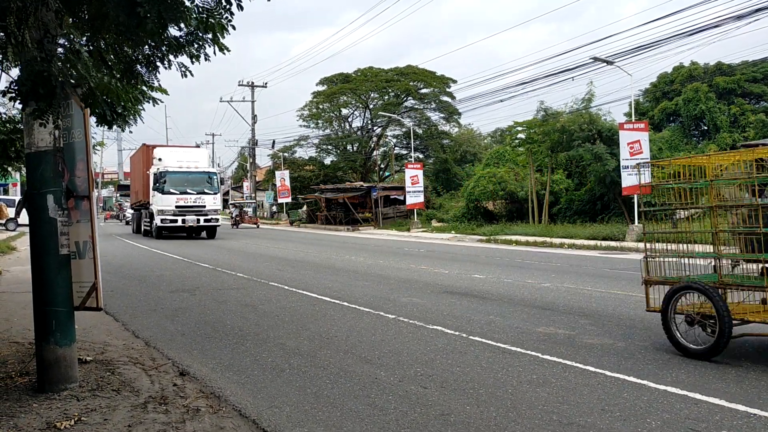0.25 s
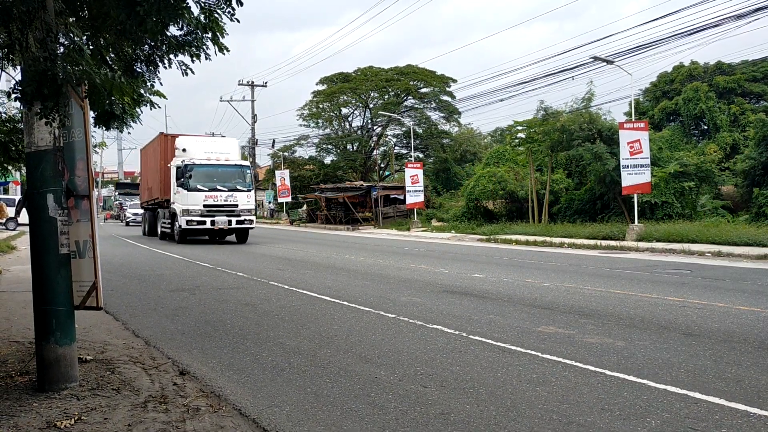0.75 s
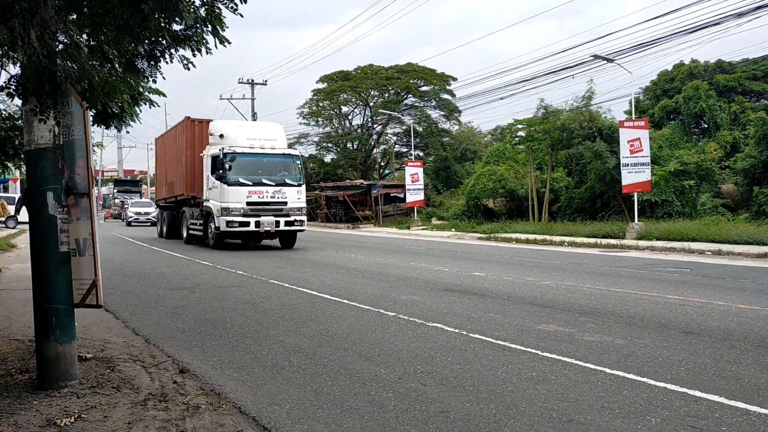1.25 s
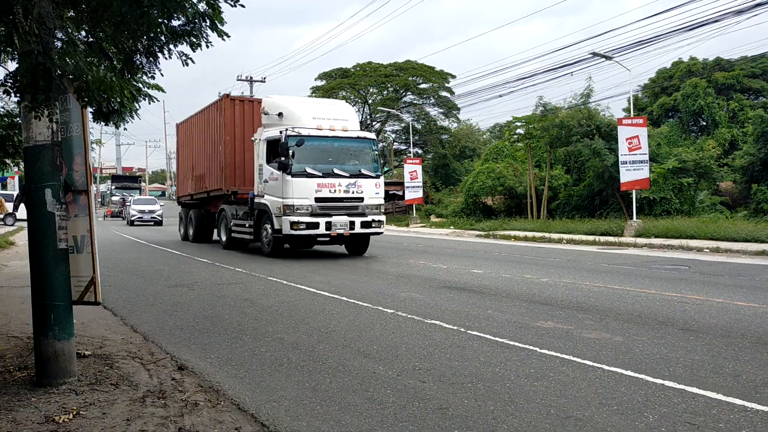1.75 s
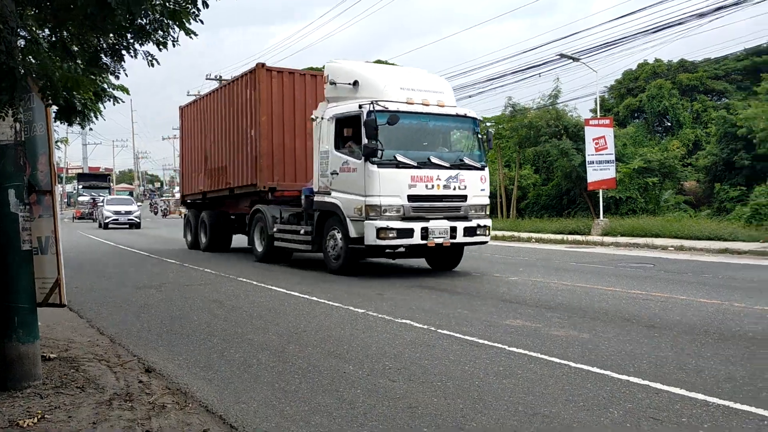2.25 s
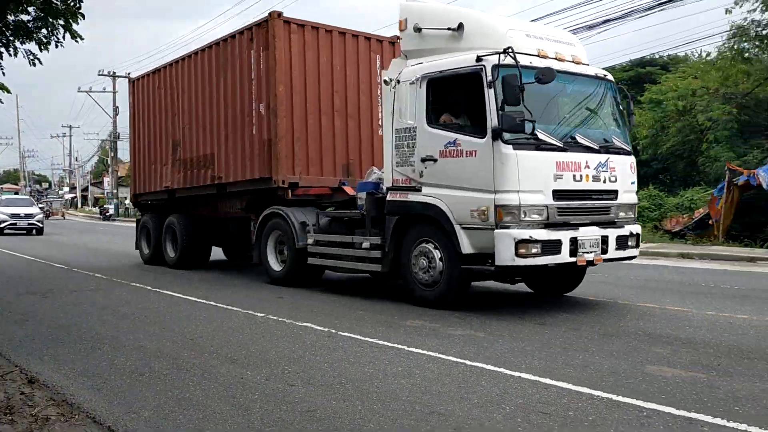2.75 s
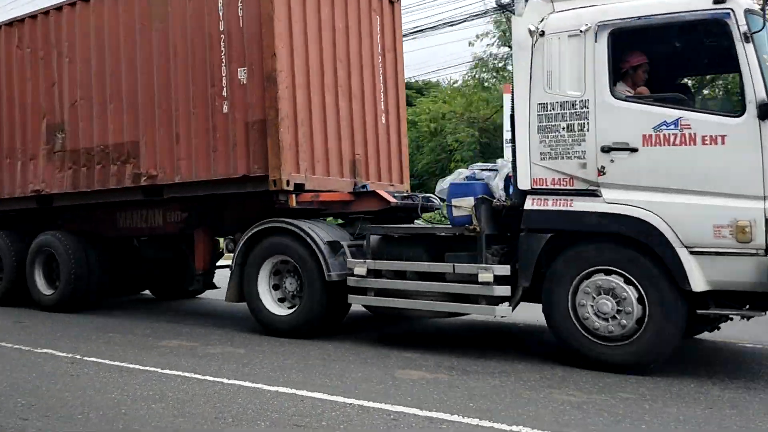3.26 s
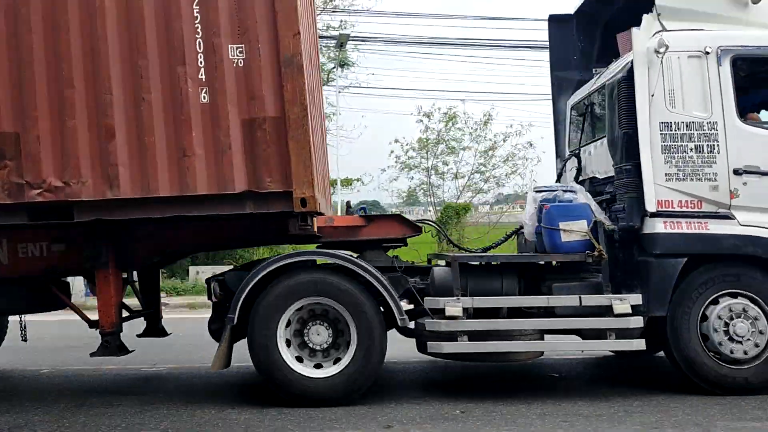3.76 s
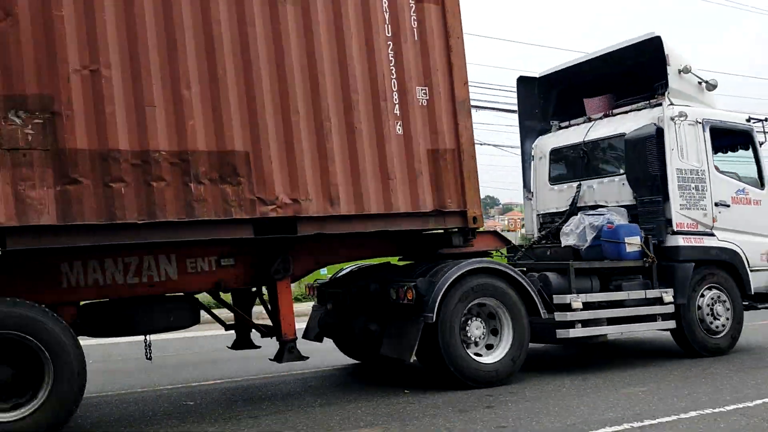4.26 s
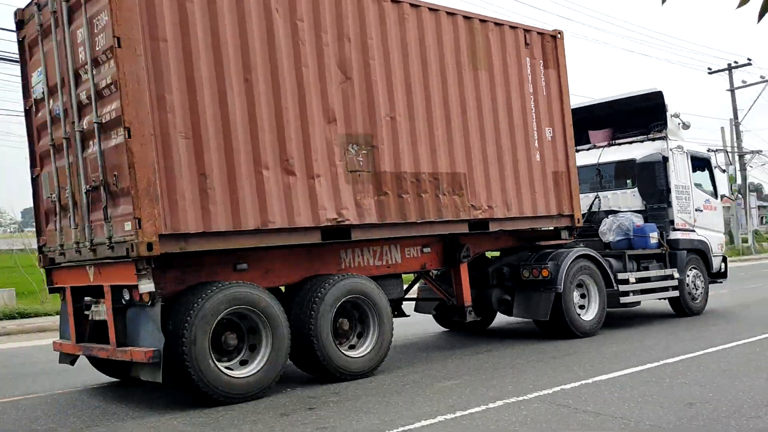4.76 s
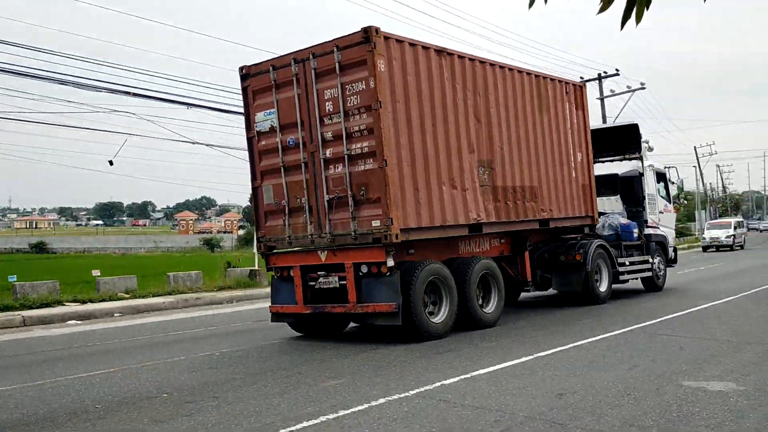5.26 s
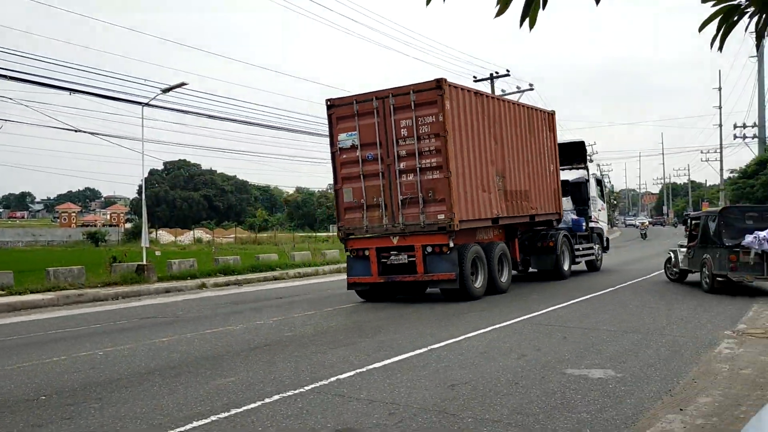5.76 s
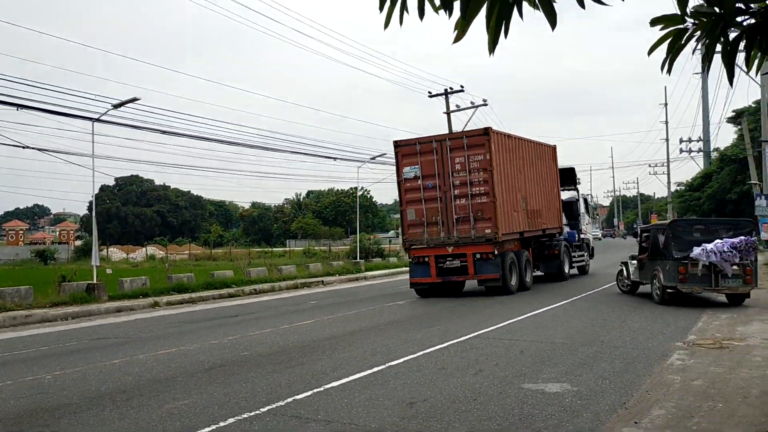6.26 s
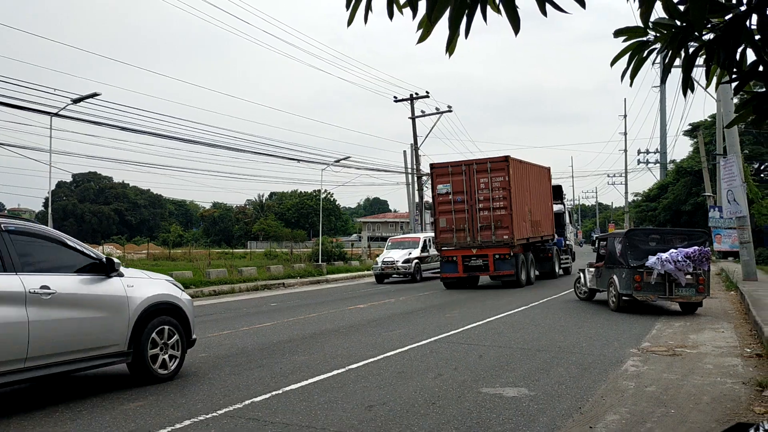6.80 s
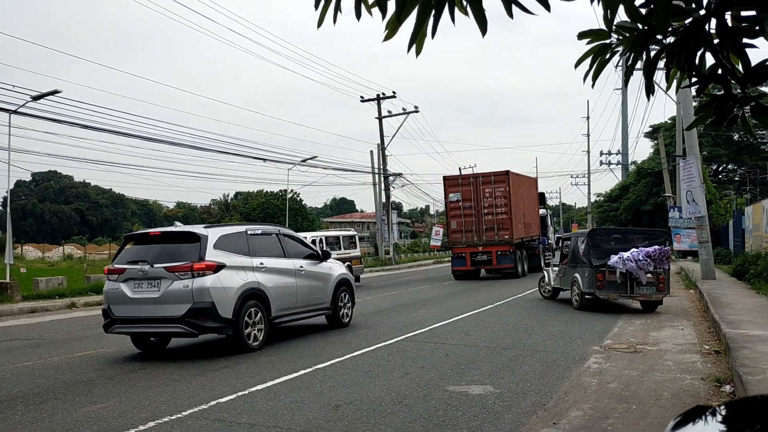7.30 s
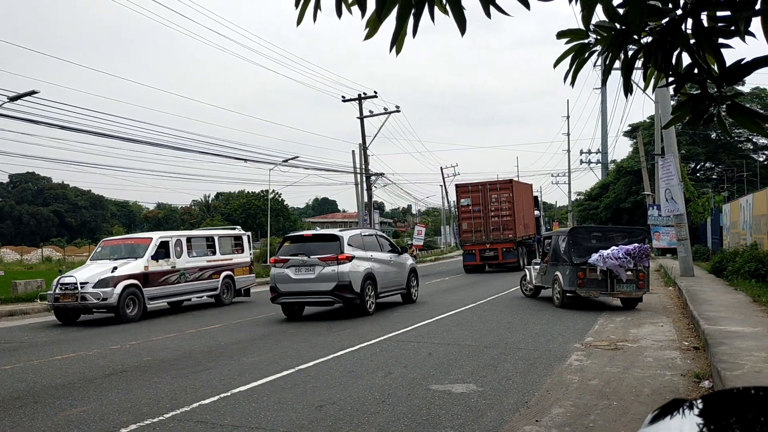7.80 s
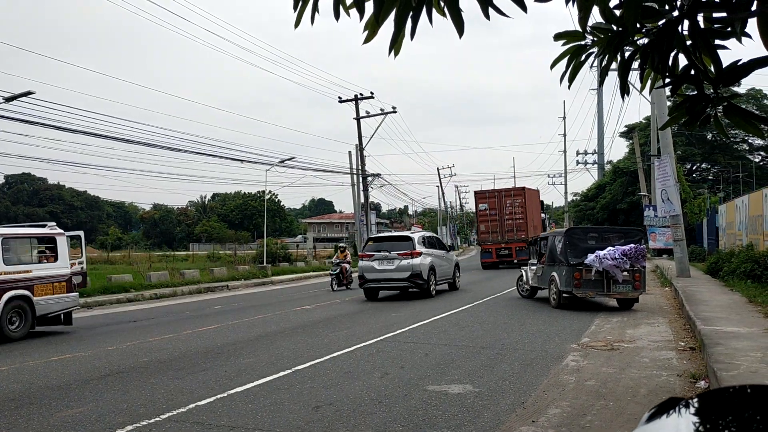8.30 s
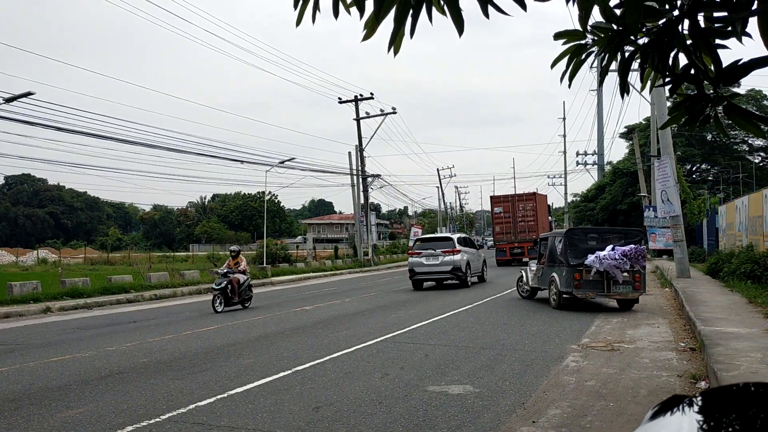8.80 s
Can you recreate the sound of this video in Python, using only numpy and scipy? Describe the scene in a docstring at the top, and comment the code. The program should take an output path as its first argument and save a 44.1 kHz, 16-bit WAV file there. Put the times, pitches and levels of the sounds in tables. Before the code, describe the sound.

A stationary microphone beside a highway catches continuous tyre noise and low rumble. First a motor tricycle's buzzing exhaust recedes; then a diesel truck swells with pulsing air hiss, whining tyres and short steel chirps, its low drone lingering behind. A car rushes past quickly, a van blends in behind it, and booming motorcycles close the scene with hard, separate exhaust thumps. Wind from the passing vehicles gently buffets the microphone.

```python
"""Roadside highway traffic

From one spot on the verge: a cargo tricycle pulls away, then a container truck rolls past with droning
exhaust, diesel clatter and a squeaking trailer. A car swishes by close behind it, followed by a van and
motorcycles, the last one thumping. Engines are harmonics of a firing rate, tyre roar and hiss are
coloured noise that swells with each pass, squeaks are short gliding tones."""
import sys
import numpy as np
from scipy import signal
from scipy.fft import rfft, irfft, next_fast_len
from scipy.io import wavfile
from scipy.ndimage import uniform_filter1d

SR = 44100
rng = np.random.default_rng(int(sys.argv[2]) if len(sys.argv) > 2 else 0)


def to_wav(s):
    """Save 16-bit WAV."""
    ch = np.atleast_2d(s).T  # columns
    pcm = np.round(np.clip(ch, -1, 1) * 32767)  # PCM
    wavfile.write(sys.argv[1], SR, pcm.astype(np.int16))


N = 398663
TIME = np.arange(N) / SR

# one-cylinder engine of the cargo tricycle: (time [s], firing rate [Hz])
TRICYCLE_ENGINE = [(0.0, 47.9), (0.22, 48.9), (1.11, 50.2), (2.25, 50.1), (3.02, 51.98), (3.9, 53.4)]
# diesel of the truck: (time [s], crank rate [turns/s], level [dB])
TRUCK_DIESEL = [(0, 28, -67), (1.2, 27.7, -41.5), (2.5, 29.4, -37.5), (3.3, 28, -45), (4.1, 27.7, -33),
                (4.6, 28, -30.5), (5.2, 24.3, -39), (6.1, 20.5, -47)]
# engine of a motorcycle: (time [s], firing rate [Hz])
BIKE_ENGINE = [(7.95, 49.9), (8.24, 49.92), (8.44, 53.3), (8.7, 52.17), (9.04, 47.7)]


def gain_of(db):
    """Decibels to amplitude."""
    return 10 ** (np.asarray(db) / 20)


def evened(x):
    """Scales to an rms of 1."""
    return x / np.sqrt(np.mean(x ** 2) + 1e-20)


def curves(rows):
    """The columns of a table after its time column, interpolated sample by sample."""
    s, *columns = np.transpose(rows)
    return [np.interp(TIME, s, column) for column in columns]


def present(rows, fade_s=0.11):
    """1 while a table runs, fading to 0 outside it."""
    start, end = rows[0][0], rows[-1][0]
    return np.interp(TIME, [start - fade_s, start, end, end + fade_s], [0, 1, 1, 0])


def coloured(x, points):
    """Gives a signal a spectrum, drawn straight over log frequency, at an rms of 1."""
    hz, db = np.transpose(points)
    size = next_fast_len(N)
    bins_hz = np.fft.rfftfreq(size, 1 / SR)
    shape_db = np.interp(np.log(bins_hz + 1), np.log(hz + 1), db, left=-100, right=-100)
    return evened(irfft(rfft(x, size) * gain_of(shape_db), size)[:N])


def noise(points):
    """Noise with the given spectrum."""
    return coloured(rng.standard_normal(N), points)


def wander(per_s):
    """Random drift at an rms of 1 that takes a new direction per_s times a second."""
    knots = rng.standard_normal(4000)
    return evened(np.interp(TIME * per_s, np.arange(len(knots)), knots))


def add(mix, s, sound):
    """Mixes a sound in at time s."""
    part = mix[round(s * SR):][:len(sound)]
    part += sound[:len(part)]


def nearness(s, rise_s, fall_s):
    """Power of something that goes by in a straight line: 1 when it is closest, at time s."""
    falloff = 2.35  # how steeply power sinks with distance
    away = (TIME - s) / np.where(TIME < s, rise_s, fall_s)
    return (1 + away ** 2) ** -falloff


def swells(rows, steady_db=-np.inf):
    """Amplitude of several swells over a steady level, summed as power."""
    power = sum(gain_of(db) ** 2 * nearness(*when) for *when, db in rows)
    return np.sqrt(gain_of(steady_db) ** 2 + power)


def exhaust(hz, orders, rough, smear=0):
    """Harmonics of a firing rate; uneven combustion makes each flutter, smear draws its phase at random."""
    turns = np.cumsum(hz) / SR
    total = 0
    for multiple, db in orders:
        flutter = 1 + rough * wander(22)
        phase = 2 * np.pi * (multiple * turns + smear * rng.random())  # smear: widest offset in cycles
        total = total + gain_of(db) * flutter * np.cos(phase)
    return np.sqrt(2) * total


def knocks(hz, depth, decay=.3):
    """Gain that leaps at every firing and dies away, decay in periods; depth is the rms swing."""
    blow = np.exp(-(np.cumsum(hz) / SR % 1) / decay)
    return 1 + np.clip(depth, 0, .7) * evened(blow - blow.mean())


def tricycle():
    """The silencer passes mostly the second order; orders swell as the tailpipe swings by."""
    # swells of three exhaust orders: (loudest at [s], rise [s], fall [s], level [dB])
    second_swells = [(.46, 0.38, 0.46, -14.5)]
    third_swells = [(.37, 0.21, 0.3, -23)]
    fourth_swells = [(.36, 0.3, 0.21, -29.5), (.93, 0.3, 0.37, -29)]
    # steady levels of these orders, left once it is far off: (second [dB], third [dB], fourth [dB])
    far_levels = (-36, -37.5, -39.5)
    # the throttle opens and the upper orders grow: (time [s], rise [s], fall [s], boost [dB])
    throttle = (3, 0.53, .55, 6.2)

    hz, = curves(TRICYCLE_ENGINE)
    lobes = zip((second_swells, third_swells, fourth_swells), far_levels)
    second, third, fourth = 20 * np.log10([swells(rows, far_db) for rows, far_db in lobes])
    *when, boost_db = throttle
    rev_db = boost_db * nearness(*when)
    third, fourth = third + rev_db, fourth + rev_db
    orders = [(1, second - 20), (2, second), (3, third - .7),
              (4, fourth - .7), (5, fourth - 8), (6, fourth - 14)]
    return present(TRICYCLE_ENGINE) * exhaust(hz, orders, rough=0.059, smear=0.62)


def traffic():
    """Sums the power of passing and distant vehicles into gains of roar, hiss, rumble, and hiss brightness."""
    # swells of passing traffic, some vehicles made of several overlapping swells: (loudest at [s],
    # rise [s], fall [s], roar [dB], hiss [dB], brightness of the hiss [0-1], rumble [dB])
    passes = [(.15, 1.1, 1.9, -27.5, -44.5, .72, -31), (2.95, 1.25, 0.7, -29, -44.5, 0.67, -36),
              (4.4, 1.23, 0.72, -24.5, -44.5, 0.7, -31), (5.9, 1.65, 0.78, -25.5, -53, 1, -39),
              (6.42, 0.11, 0.2, -25, -47.5, 0, -35), (6.83, 0.078, 0.11, -21, -45, .1, -33),
              (6.96, 0.095, 0.094, -19.5, -38, .15, -41), (7.66, 0.8, .5, -27, -48.5, .05, -34),
              (8.0, 0.24, .3, -28, -40.5, 0.7, -36), (8.12, 0.064, 0.12, -23, -38, 0.7, -29),
              (8.33, .1, 0.049, -21, -34.5, .75, -27.5), (8.57, 0.21, 0.18, -21, -38.5, .95, -33),
              (8.78, 0.15, 0.11, -19.5, -37, 1, -29), (8.97, 0.15, 0.27, -24, -42.5, 0, -28)]
    far = (-30.5, -51, .3, -35)  # distant traffic: the last four columns of the same kind

    near = np.array([np.ones(N)] + [nearness(*row[:3]) for row in passes])
    roar_db, hiss_db, brightness, rumble_db = np.transpose([far] + [row[3:] for row in passes])
    roar_gain, hiss_gain, rumble_gain = np.sqrt(gain_of([roar_db, hiss_db, rumble_db]) ** 2 @ near)
    bright_power = (brightness * gain_of(hiss_db) ** 2) @ near
    return roar_gain, hiss_gain, rumble_gain, bright_power / hiss_gain ** 2


def shifting(x, patchy_db=1.5):
    """Narrow bands of the noise rise and sink at random for a moment."""
    spectrum = signal.stft(x, nperseg=1024)[2]
    patches = uniform_filter1d(rng.standard_normal(spectrum.shape), size=3, axis=0)  # over frequency
    patches = evened(uniform_filter1d(patches, size=14, axis=1))  # over time
    return evened(signal.istft(spectrum * gain_of(patchy_db * patches), nperseg=1024)[1][:N])


def roar(level):
    """Tyre and machine noise; each vehicle's colour takes over from the last at equal power."""
    # colour of the roar from each vehicle: (frequency [Hz], density [dB per Hz])
    TRICYCLE_ROAR = [(140, -23), (240, -5.5), (327, -10.5), (477, -8), (650, -8.5), (714, -12.5),
                     (1140, -5.5), (1400, -6.5), (1540, -8.5), (2190, -8.5), (3550, -20), (4230, -28.5),
                     (6000, -36.5), (7800, -64), (13200, -120)]
    TRUCK_FRONT = [(140, -30), (240, -17.5), (314, -2.5), (350, -5.5), (483, -4), (633, -8.5), (744, -7),
                   (961, -4.5), (1040, -2), (1190, -4), (1710, -3.5), (3270, -14), (6000, -37), (7800, -56),
                   (13200, -120)]
    TRUCK_SIDE = [(140, -35), (240, -10.5), (290, -5.5), (390, -6.5), (477, -12), (497, -7.5), (633, -10.5),
                  (734, -4), (923, -1), (1480, -5.5), (1650, -4), (3500, -14.5), (4120, -26), (5240, -31),
                  (6000, -33), (7800, -57), (13200, -120)]
    TRUCK_REAR = [(140, -24), (240, -4), (282, -17.5), (355, -12), (385, -12), (497, -11), (538, -11.5),
                  (592, -12), (796, -4.5), (1650, -6), (2530, -9.5), (5390, -37.5), (6000, -42),
                  (7800, -67), (13200, -120)]
    CAR_SIDE = [(140, -38), (240, -16), (290, -5), (310, -15), (395, -9), (464, -25), (497, -5),
                (531, -17.5), (764, -2.5), (1060, -9), (1210, -4.5), (2040, -4.5), (3800, -17.5),
                (4340, -28), (6000, -34), (7800, -60), (13200, -120)]
    CAR_REAR = [(140, -44), (240, -18), (286, -7), (310, -23), (345, -11), (417, -13), (446, -6), (546, -9),
                (817, -1.5), (1130, -7), (1220, -4), (2280, -8.5), (2570, -9), (4460, -29.5), (6000, -51),
                (7800, -69), (13200, -120)]
    BIKE_ROAR = [(140, -38), (240, 1.5), (271, -6.5), (471, -12.5), (633, -9.5), (817, -6.5), (1040, -9.5),
                 (1440, -7.5), (1600, -7), (2280, -7.5), (2500, -7), (2860, -11.5), (3550, -16.5),
                 (4970, -32.5), (6000, -34), (7800, -63), (13200, -120)]
    # when each is the nearest: (from [s], to [s], colour [table above])
    nearest = [(0, .6, TRICYCLE_ROAR), (1.1, 2.6, TRUCK_FRONT), (3.9, 4.744, TRUCK_SIDE),
               (5.047, 6.66, TRUCK_REAR), (6.802, 7.004, CAR_SIDE), (7.103, 7.708, CAR_REAR),
               (8.25, 9.039, BIKE_ROAR)]

    times = np.ravel([row[:2] for row in nearest])
    owner = np.arange(len(times)) // 2
    blend = np.zeros(N)
    for k, (_, _, colour) in enumerate(nearest):
        share = np.interp(TIME, times, 1. * (owner == k))
        blend += np.sqrt(share) * noise(colour)
    unsteady = gain_of(-0.47 + 0.46 * wander(30))
    return level * unsteady * shifting(blend, patchy_db=1.41)


def hiss(level, brightness, grit_per_s=500, grit_db=-10):
    """Air squeezed from the treads, with ticks of grit; brightness differs by vehicle, with short spurts."""
    # bright and dull spectra of the hiss: (frequency [Hz], density [dB per Hz])
    bright_colour = [(2940, -31), (5000, -9.5), (6130, -7.5), (7310, 0), (9190, -6), (10600, -3),
                     (15100, -0.5), (16000, -12)]
    dull_colour = [(2940, -37), (5000, -5), (6440, -1), (7640, 2), (8920, -7.5), (10800, -4), (13600, -9),
                   (15200, -19), (16000, -22)]
    # short spurts of bright hiss: (time [s], rise [s], fall [s], level [dB])
    spurts = [(1.12, 0.045, .13, -44.5), (4.38, 0.039, .04, -44)]

    share = np.clip(brightness, 0, 1)
    grit = (rng.random(N) < grit_per_s / SR) * rng.standard_normal(N)
    spray = rng.standard_normal(N) + gain_of(grit_db) * evened(grit)
    bright = np.hypot(level * share, swells(spurts)) * coloured(spray, bright_colour)
    dull = level * (1 - share) * coloured(spray, dull_colour)
    return gain_of(-.5 + 0.31 * wander(40)) * (bright + dull)


def rumble(level):
    """Low engine noise, and the wake of the vehicles buffeting the microphone."""
    # spectra of the engine noise and of the buffeting: (frequency [Hz], density [dB per Hz])
    engine_colour = [(40, -13), (60, 4.5), (85, 2), (115, 3.5), (160, -1), (230, -2.5), (290, -8),
                     (400, -18.5)]
    air_colour = [(8, -27), (18, -10), (28, 10), (38, -1), (55, -11), (90, -37)]
    # gusts of wake at the microphone: (time [s], rise [s], fall [s], level [dB])
    gusts = [(3.42, .3, 0.1, -25.5), (3.85, .16, 1.6, -25.5), (8.14, 0.11, .13, -22)]

    breeze_db = -37
    return level * noise(engine_colour) + swells(gusts, breeze_db) * noise(air_colour)


def clatter():
    """Combustion knock: a gain that chops the tyre noise at the firing rates of three engines."""
    crank_hz, _ = curves(TRUCK_DIESEL)
    tricycle_hz, = curves(TRICYCLE_ENGINE)
    bike_hz, = curves(BIKE_ENGINE)
    diesel = knocks(2 * crank_hz, 0.046 * present(TRUCK_DIESEL), decay=0.37)  # two firings a turn
    single = knocks(tricycle_hz, 0.044 * np.exp(-TIME / 1.5), decay=0.31)
    bike = knocks(bike_hz, .085 * present(BIKE_ENGINE), decay=.25)
    return diesel * single * bike


def truck():
    """Crank orders from the engine; the deep drone appears once the tailpipe faces this way."""
    # harmonics of the crank rate: (multiple [-], level [dB])
    crank_orders = [(1, -1), (2, -5), (3, -21), (4, -6), (5, -10), (6, -3), (8, -11), (10, -11.5)]
    # exhaust drone: (time [s], level [dB])
    drone = [(3.9, -35), (4.35, -23.5), (5.25, -22.5), (6.0, -24.5), (7.2, -30.5), (8.1, -30)]

    crank_hz, engine_db = curves(TRUCK_DIESEL)
    engine = gain_of(engine_db) * exhaust(crank_hz, crank_orders, rough=0.35)
    pipe_db, = curves(drone)
    pipe_hz = 50.1 + 0.18 * wander(3.05)
    pipe = gain_of(pipe_db) * exhaust(pipe_hz, [(1, 0.1), (2, -17.5)], rough=0.049)
    return present(TRUCK_DIESEL) * engine + present(drone) * pipe


def ringing(white, hz, width_hz):
    """Two rows of white noise, smoothed and carried up to a pitch curve: a narrow resonance."""
    r = np.exp(-2 * np.pi * width_hz / SR)
    a, b = signal.lfilter([1], [1, -2 * r, r * r], white)[:, -len(hz):]
    phase = 2 * np.pi * np.cumsum(hz) / SR
    return evened(a * np.cos(phase) + b * np.sin(phase))


def whines():
    """Each resonance swells as its vehicle comes near, and sinks in pitch as it goes by."""
    # ringing bands of tyres, gears and panels:
    # (from [s], to [s], middle pitch [Hz], width [Hz], level at the middle [dB])
    bands = [(0.852, 1.499, 1320, 48.6, -36), (0.995, 2.0, 2110, 160, -42), (2.1, 2.901, 1075, 70, -42),
             (2.9, 3.9, 2090, 160, -34.5), (3.599, 4.999, 945, 100, -34), (4.3, 4.9, 1655, 70, -34),
             (4.1, 4.901, 3470, 130, -45), (6.1, 6.652, 1185, 70, -34), (6.698, 7.151, 770, 95, -31),
             (6.755, 7.045, 2095, 90, -37), (7.2, 8.405, 2540, 80, -38), (8.1, 9.038, 2575, 100, -30)]
    sag = 0.01293  # share by which the pitch lies above its middle at first, and below it at last

    out = np.zeros(N)
    draws = rng.standard_normal((len(bands), 2, 2 * SR))
    for (start, end, middle_hz, width_hz, db), white in zip(bands, draws):
        hz = middle_hz * (1 + sag * np.linspace(1, -1, int((end - start) * SR)))
        swell = np.sin(np.linspace(0, np.pi, len(hz)))
        add(out, start, gain_of(db) * swell * ringing(white, hz, width_hz))
    return out


def spitting(puff_hz=29, depth=.25, bursts_per_s=22, flicker=0.36, burst_s=0.006):
    """Gain: the approaching truck spits air about once a crank turn; random bursts make the hiss flicker."""
    facing = np.interp(TIME, [1.5, 1.9, 2.4, 3.0], [0, 1, 1, 0])
    puffs = knocks(np.full(N, puff_hz), depth * facing * (1 + 0.34 * wander(18)), decay=0.19)
    kicks = (rng.random(N) < bursts_per_s / SR) * rng.random(N)
    bursts = signal.lfilter([1], [1, -np.exp(-1 / (burst_s * SR))], kicks)
    return puffs * (1 + 2 * flicker * (bursts - bursts.mean()))


def faint_squeaks(count=22, level_db=-54):
    """Smaller joints chirp at random while the trailer is close: time, level, pitch, length, octave level."""
    return [(3.2 + 3.1 * when, level_db + 5 * size, 5950 + 600 * pitch, 0.015 + 0.036 * length, 1)
            for when, size, pitch, length in rng.random((count, 4))]


def squeaks(waver=0.0118, sag=0.019, echo_db=-6, echo_t60=0.32):
    """Dry steel joints slip and sing briefly; the road and the container scatter the sound."""
    # trailer squeaks: (time [s], level of the fundamental [dB], pitch [Hz], length [s])
    trailer_joints = [(1.893, -46, 7140, .055), (2.517, -43, 6670, 0.05), (2.933, -38, 7050, 0.062),
                      (3.019, -37, 7140, 0.036), (3.03, -42, 10880, .037), (3.368, -40, 10750, .041),
                      (3.52, -43, 6280, 0.036), (3.7, -44, 6400, .053), (3.888, -42, 10830, .03),
                      (3.995, -36, 7040, .05), (4.013, -33, 10700, .03), (4.082, -33.5, 6900, 0.046),
                      (4.873, -43, 6500, 0.041), (4.896, -44, 10470, .04), (5.162, -38.5, 10840, 0.041),
                      (5.211, -39, 6830, 0.032), (5.281, -42, 10700, .035), (5.6, -44, 6730, .045),
                      (5.616, -44, 10540, 0.043), (6.34, -51, 6240, .037)]
    octave_db = -4  # second harmonic, against the fundamental

    out, unsteady = np.zeros(N), wander(350)
    joints = [(*row, octave_db) for row in trailer_joints] + faint_squeaks()
    for s, db, hz, length_s, second_db in joints:
        u = np.linspace(0, 1, int(length_s * SR))
        pitch = hz * (1 + sag * (.5 - u) + waver * unsteady[round(s * SR):][:len(u)])
        phase = 2 * np.pi * np.cumsum(pitch) / SR
        tone = np.sin(phase) + gain_of(second_db) * np.sin(2 * phase)
        add(out, s, gain_of(db) * np.sqrt(abs(np.sin(np.pi * u))) * tone)
    t = np.arange(SR // 2) / SR
    tail = rng.standard_normal(len(t)) * gain_of(-60 * t / echo_t60)
    echo = signal.fftconvolve(out, tail / np.linalg.norm(tail))[:N]
    return out + gain_of(echo_db) * echo


def car():
    """Smooth engine hum of the car and the van, sinking in pitch and swelling as each draws level."""
    # engines of the car and the van: (time [s], firing rate [Hz])
    firing = [(6.15, 56.3), (6.9, 56), (7.5, 55.5), (8.1, 54)]
    # swells of two orders: (loudest at [s], rise [s], fall [s], level [dB])
    second_swells = [(6.5, .9, 0.82, -35), (7.4, .2, .5, -30), (7.9, .35, .3, -31)]
    third_swells = [(6.36, 0.1, .17, -30.5), (6.85, 0.2, 0.26, -30), (7.5, 0.36, .8, -40)]

    hz, = curves(firing)
    second, third = 20 * np.log10([swells(second_swells), swells(third_swells)])
    orders = [(2, second), (3, third), (4, third - 8), (5, second - 13), (6, second - 14)]
    return present(firing) * exhaust(hz, orders, rough=.1)


def motorcycles():
    """A booming, rough buzz, then separate exhaust thumps: a dip of pressure and its rebound."""
    # harmonics of the buzz: (multiple [-], level [dB])
    buzz_orders = [(2, -0.5), (3, 1.5), (4, -6.5), (5, -10), (6, -12), (7, -12)]
    # swells of the buzz, and of the boom at the firing rate: (time [s], rise [s], fall [s], level [dB])
    buzz_swells = [(8.33, 0.1, 0.088, -30.5), (8.6, 0.4, .5, -38.5), (8.82, 0.055, 0.069, -26.5)]
    boom_swells = [(8.33, 0.053, 0.29, -21.5)]
    # exhaust thumps of the last motorcycle: (time [s], level [dB])
    thump_list = [(8.855, -10.5), (8.869, -13), (8.921, -12), (8.933, -14), (8.985, -10)]

    hz, = curves(BIKE_ENGINE)
    buzz = swells(buzz_swells) * exhaust(hz, buzz_orders, rough=0.33)
    boom = swells(boom_swells) * exhaust(hz, [(1, 0)], rough=0.088)
    out = present(BIKE_ENGINE) * (buzz + boom)
    t = np.arange(0, .04, 1 / SR)
    u = t / 0.0033
    thump = -np.sin(2 * np.pi * 88 * t) * u * np.exp(1 - u)
    for s, db in thump_list:
        add(out, s - .002, gain_of(db) * thump)  # starts 2 ms ahead of the listed time
    return out


def scene():
    """All the traffic, heard from one spot."""
    roar_gain, hiss_gain, rumble_gain, brightness = traffic()
    engines = tricycle() + truck() + car() + motorcycles()
    tyres = roar(roar_gain) + whines() + spitting() * hiss(hiss_gain, brightness)
    return (engines + clatter() * tyres + rumble(rumble_gain) + squeaks())[None]


def record(dry):
    """The recorder's band limit: a steep low-pass."""
    edge_hz = 15850
    lowpass = signal.firwin(511, edge_hz, window=("kaiser", 9), fs=SR)
    return signal.oaconvolve(dry, lowpass[None], "same")


dry = scene()
out = record(dry)
to_wav(out)
```